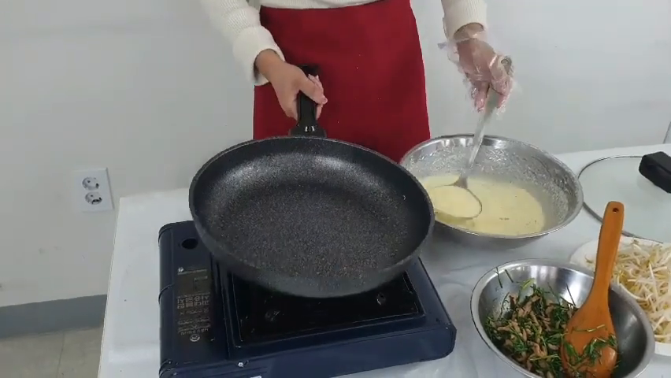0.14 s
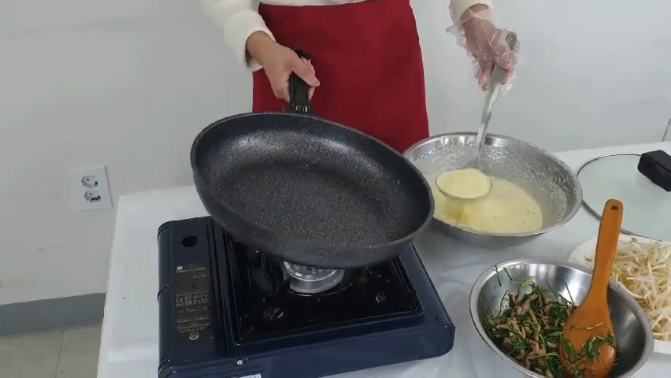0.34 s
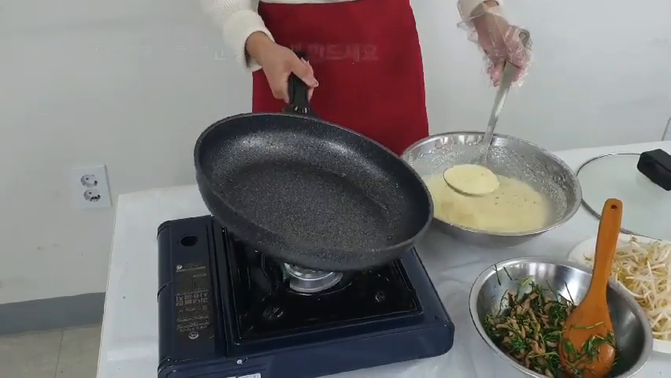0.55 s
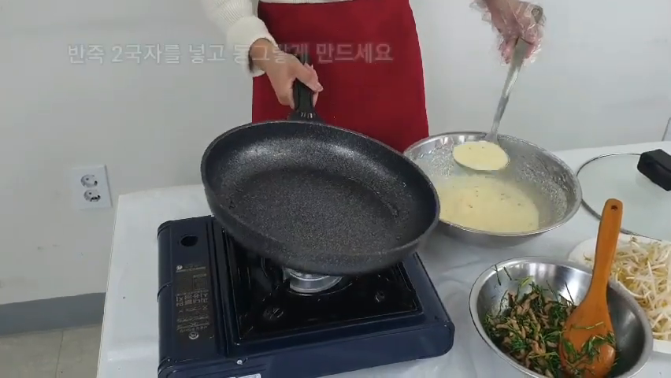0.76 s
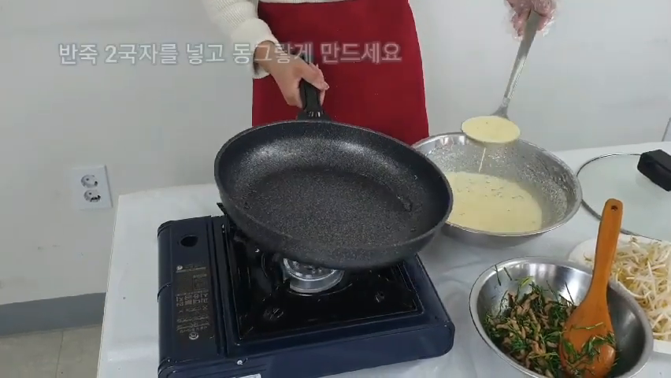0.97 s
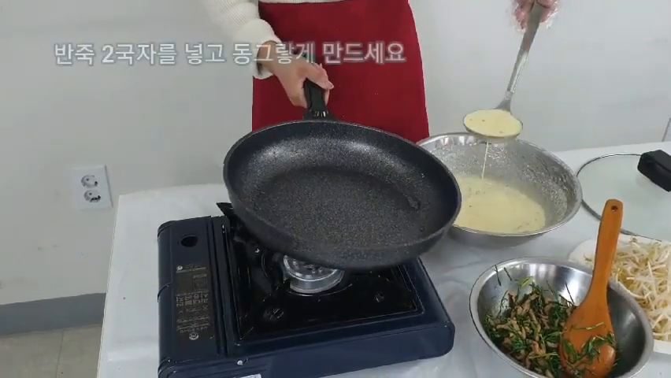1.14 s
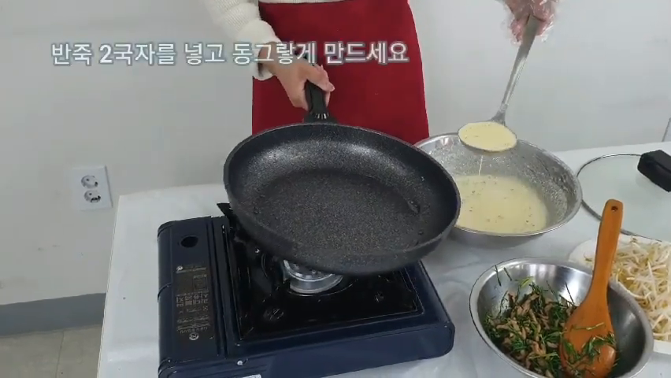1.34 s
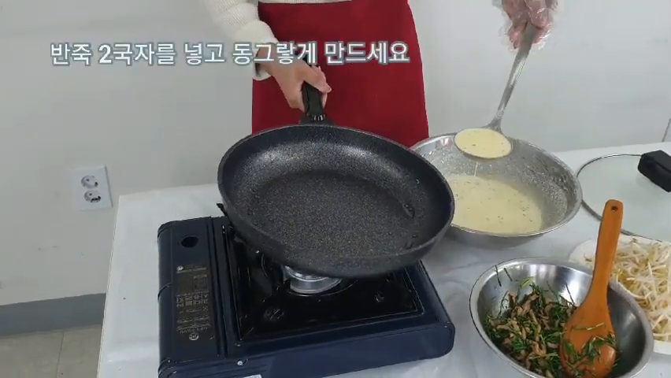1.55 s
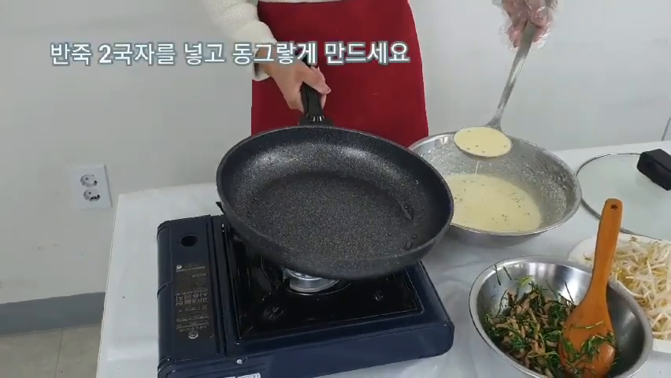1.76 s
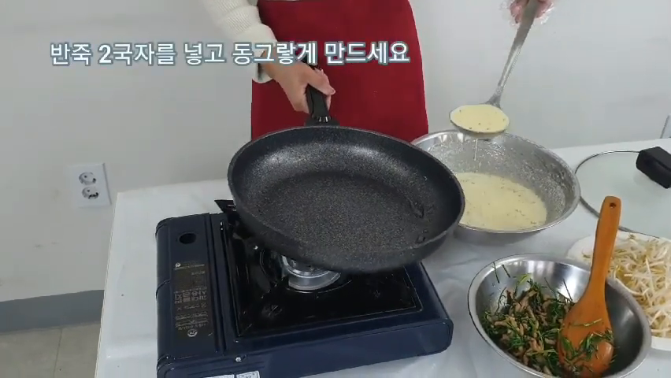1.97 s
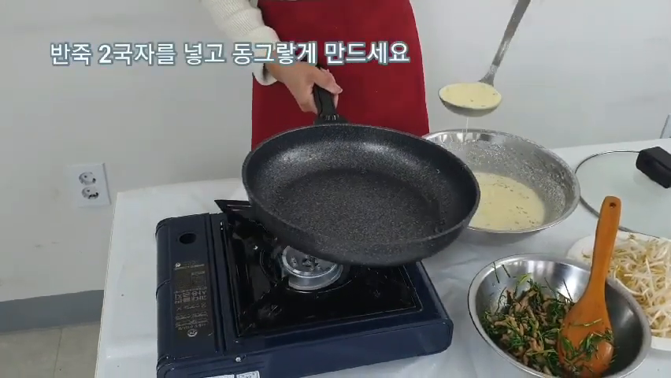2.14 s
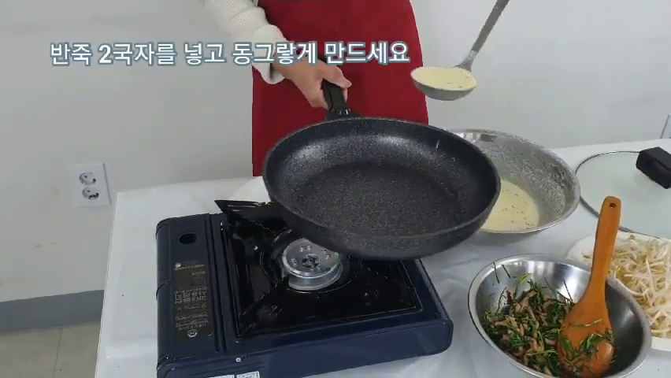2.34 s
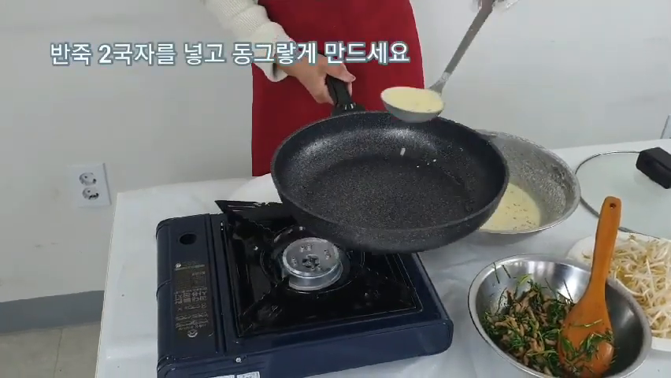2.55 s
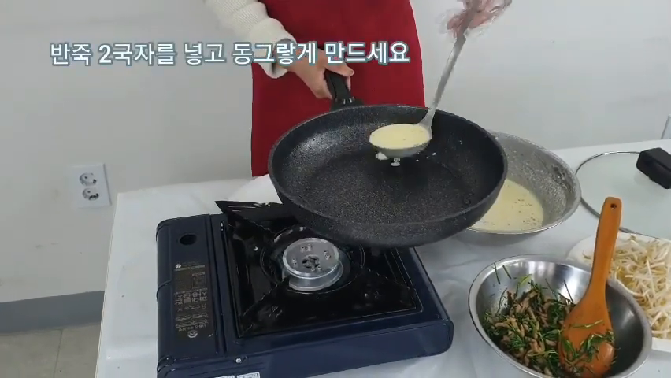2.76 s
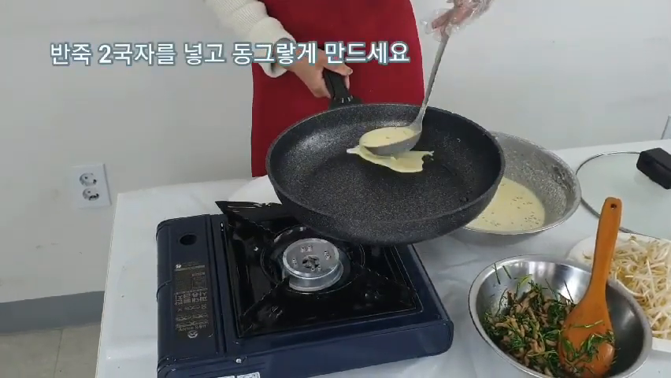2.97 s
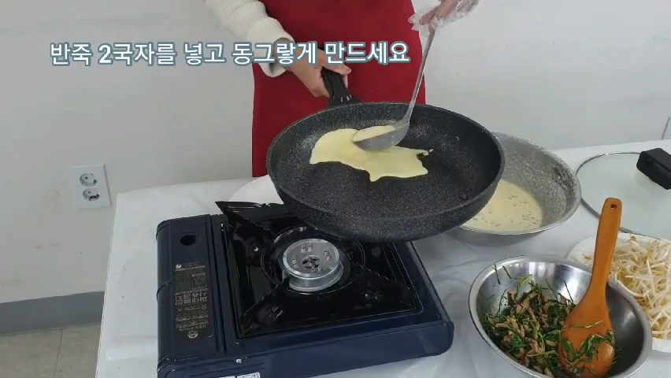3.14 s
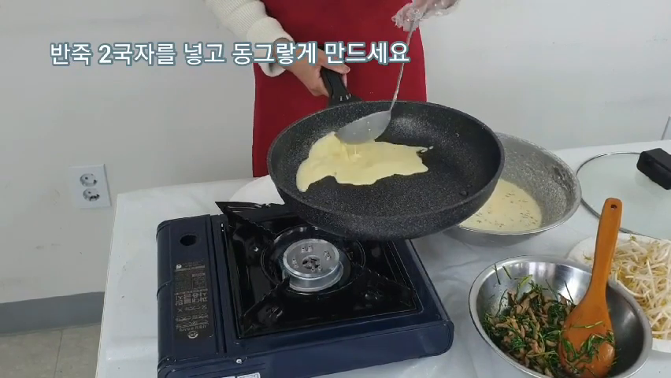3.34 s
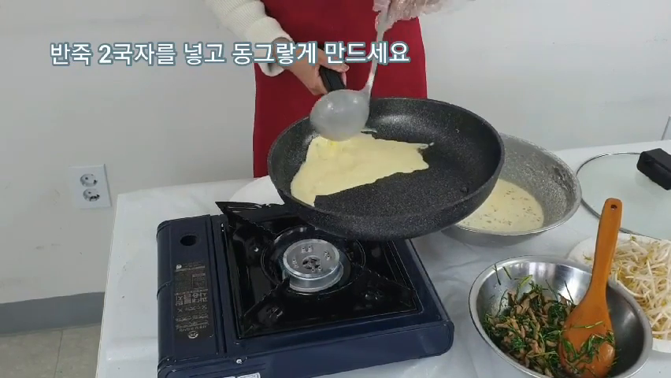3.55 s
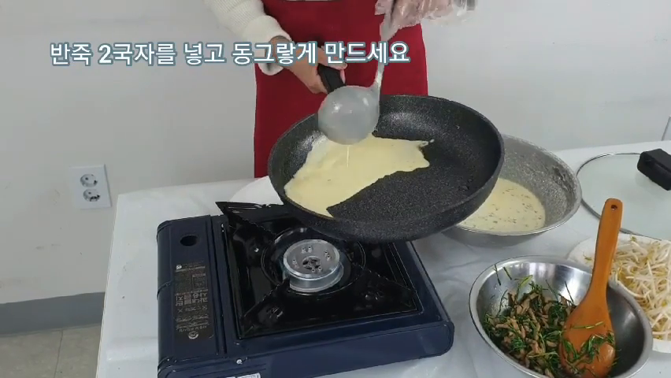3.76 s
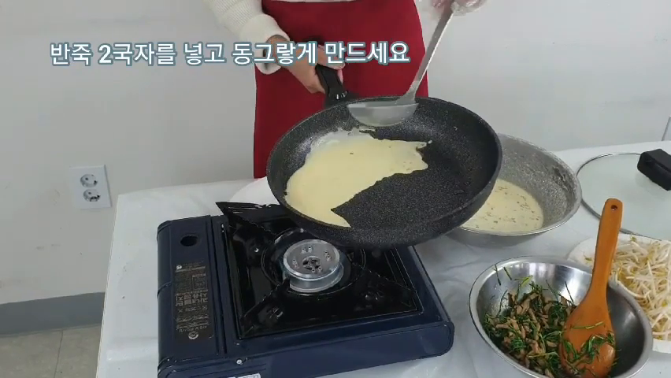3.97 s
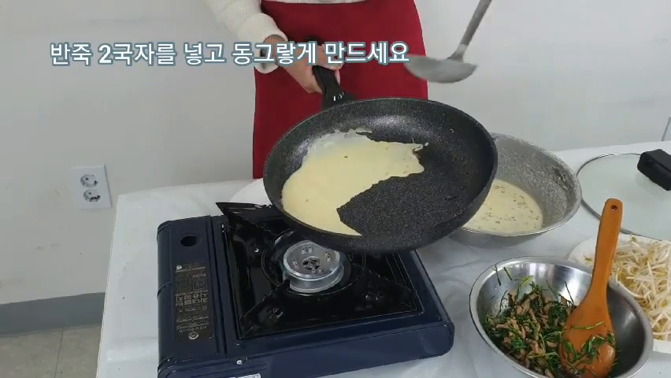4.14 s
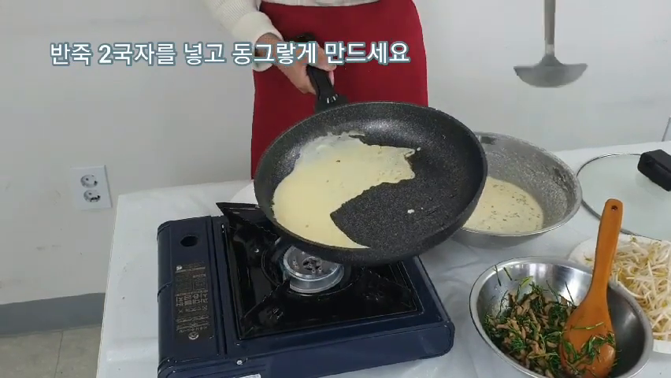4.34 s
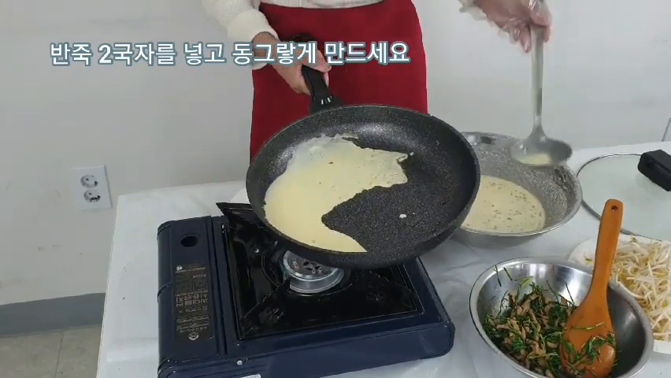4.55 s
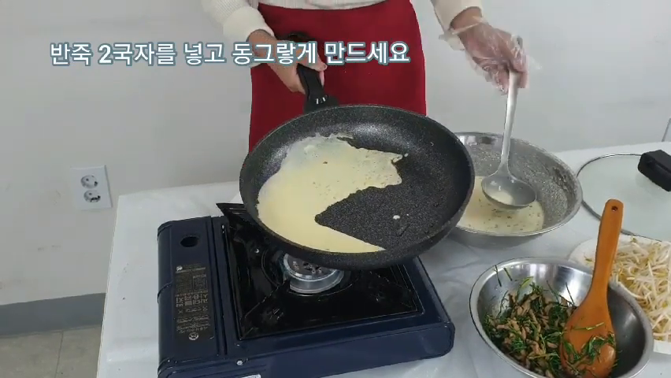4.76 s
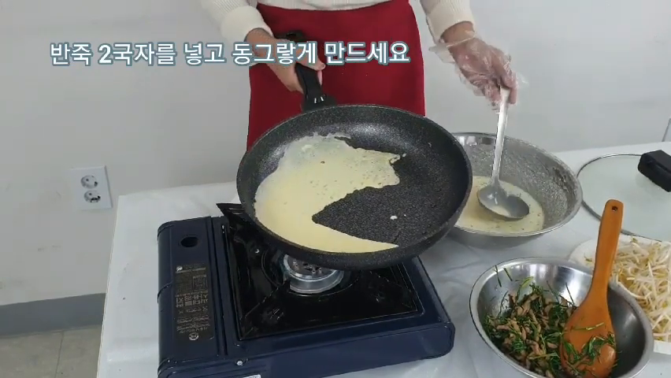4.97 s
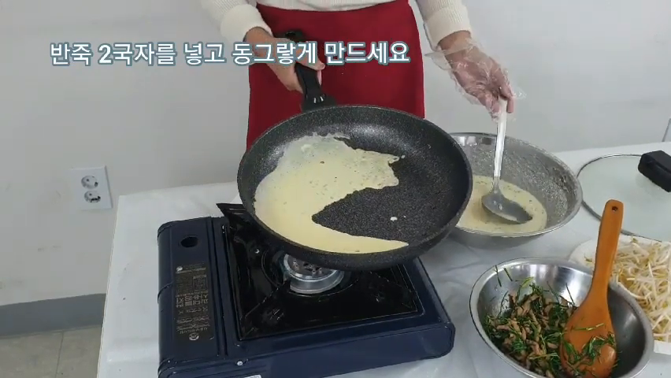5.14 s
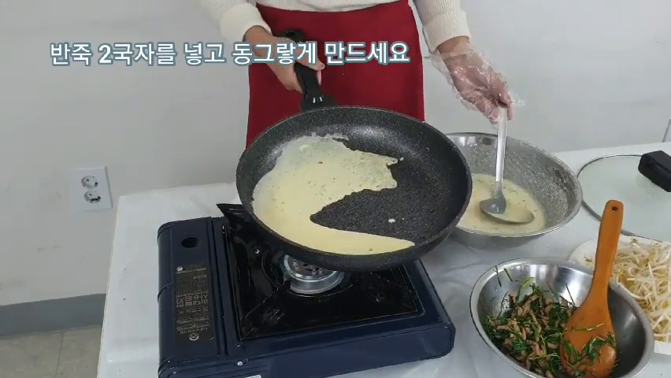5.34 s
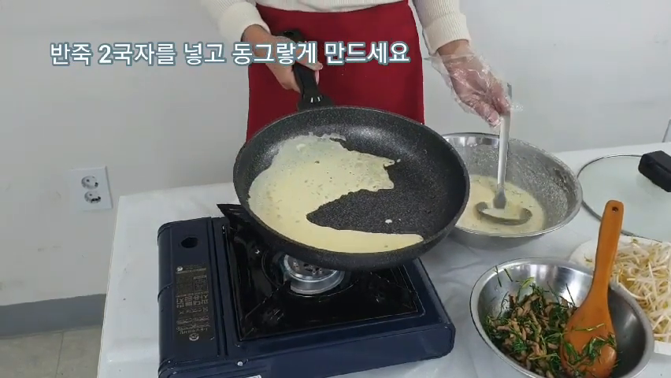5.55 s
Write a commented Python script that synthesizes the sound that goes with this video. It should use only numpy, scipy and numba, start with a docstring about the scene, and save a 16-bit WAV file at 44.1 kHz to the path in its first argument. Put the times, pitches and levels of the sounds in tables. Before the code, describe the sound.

A low motor hum fills a hard-walled kitchen. A frying pan knocks lightly on a burner, then a sleeve and plastic glove rustle while a ladle clinks and scrapes in a steel bowl. The pan gives a soft, low thump. About halfway through, batter meets hot oil and erupts into a spitting, bubbling sizzle that carries on. At the end the ladle knocks dully in the bowl. A stereo microphone faces the stove.

```python
"""A hard-walled kitchen, a stereo microphone pair facing the stove, a motor humming throughout.
The pan knocks on the burner; sleeve and plastic glove rustle as the ladle clinks and scrapes in the bowl.
The pan grazes the burner and jolts in the hand. From 2.4 s drips of batter hiss in the hot oil; at 2.8 s
the pour erupts in spits and bursting steam bubbles, which grow larger and calmer as the batter spreads.
At the end the ladle goes back into the mixing bowl and knocks against it."""
import sys
import numpy as np
from scipy import signal
from scipy.fft import rfft, irfft, next_fast_len
from scipy.io import wavfile
from scipy.ndimage import map_coordinates
from numba import njit

SR = 44100
rng = np.random.default_rng(int(sys.argv[2]) if len(sys.argv) > 2 else 0)


def transcribe(u):
    """Save the signal u as a 16-bit wav file named by the first command-line argument.

    u: samples, shape (n,) or (channels, n), limited to [-1, 1]; the rate is SR.
    q: integer samples, one column per channel.
    """
    v = np.clip(np.atleast_2d(u).T, -1, 1)
    q = np.round(v * 32767).astype(np.int16)
    wavfile.write(sys.argv[1], SR, q)


N = 246903
T = np.arange(N) / SR

# motor harmonics: (multiple, relative level [dB], phase shift either way at the microphones [rad])
HUM_HARMONICS = [(1, 0.5, 0.16), (2, 3.0, .02)]
# the hum swells and sags: (time [s], change [dB], half length [s])
HUM_DRIFTS = [(0.843, -6, 0.05), (2.113, 6, 0.049), (2.33, -7, 0.035), (2.785, -2, .08),
              (3.032, 6.5, 0.078), (3.478, 3.2, 0.21), (4.11, 2.5, 0.13), (4.753, -3, 0.085)]
# room tone: (frequency [Hz], relative level [dB])
AIR_SPECTRUM = [(20, 1.5), (35, -4.5), (55, 3), (90, 1), (170, -1), (260, -4.5), (450, -9.5), (800, -16.5),
                (1600, -23.5), (3200, -32.5), (7000, -35.5), (15500, -36.5)]
# stereo width of the room: (frequency [Hz], side minus mid [dB])
ROOM_WIDTH = [(30, -5.5), (110, -15), (200, -14), (380, -9), (700, -1), (1300, 0.5), (15000, -4)]

# arm strokes: (time [s], relative rub level [dB], relative crinkle level [dB], rise [s], fade [dB/s])
ARM_STROKES = [(-.02, -56.5, -64, 0.018, 44), (.53, -59, -62, 0.011, 43), (.86, -64, -71, 0.041, 12),
               (1.064, -52.5, -59, 0.005, 23), (1.145, -52.5, -76, .012, 70), (1.228, -46, -50, 0.0054, 44),
               (1.343, -46.5, -52.5, 0.0058, 83), (1.425, -50, -60, .008, 98.5),
               (1.555, -49, -51, 0.037, 50), (1.652, -51, -57, 0.013, 80), (1.745, -51.5, -57.5, 0.015, 80),
               (1.805, -53.5, -62, 0.01, 100), (2.05, -68, -71, .015, 100)]
# sleeve cloth and glove plastic: (frequency [Hz], relative level [dB])
RUB_SPECTRUM = [(400, 3), (750, 0.5), (1300, -1.5), (1700, 2.5), (2400, -1.5), (3200, -6.5), (4500, -14),
                (8000, -42)]
CRINKLE_SPECTRUM = [(2000, -12), (3500, -5.5), (4800, -2.5), (8000, -3.5), (11000, -8), (15500, -6.5)]
# the glove snaps as it creases: (time [s], relative level [dB])
GLOVE_SNAPS = [(1.0657, -36.5), (1.1724, -49), (1.2303, -37), (1.2767, -39), (1.357, -37), (1.4294, -35),
               (1.455, -43), (1.598, -43), (1.659, -35), (1.675, -37), (1.819, -43)]
# thick batter sloshes: (time [s], level [dB], centre [Hz])
BATTER_SLOSHES = [(-.015, -46.5, 278), (-.01, -53.5, 690), (3.77, -44, 260), (3.86, -45, 210),
                  (5.25, -43, 430), (5.37, -44, 215), (5.425, -44, 204), (5.559, -35, 580),
                  (5.56, -37, 215)]
# light clinks of the ladle: (time [s], level [dB], pitch [Hz])
LADLE_CLINKS = [(.055, -51.5, 1480), (1.066, -51, 3560), (1.127, -54, 3400), (1.167, -54, 2950)]
# ladle on the steel bowl: (time [s], level [dB], pitch [Hz], width [Hz], rise [s], fade [dB/s])
LADLE_SCRAPES = [(.322, -58, 3000, 400, .01, 102), (.395, -68, 3240, 400, .03, 80),
                 (.53, -57, 1920, 650, 0.032, 85), (1.165, -61, 2850, 600, .012, 60),
                 (1.345, -51.5, 2200, 1100, 0.014, 90), (1.535, -48, 2220, 910, 0.055, 47),
                 (1.75, -52.5, 2300, 1000, 0.018, 90), (5.552, -39, 6500, 6000, 0.026, 150)]

# the pan knocks on the burner: (time [s], level [dB])
BURNER_KNOCKS = [(0.001, -40)]
# the burner's casing: (frequency [Hz], relative level [dB], t60 [s])
BURNER_MODES = [(191, -3, 0.19), (253, 0, .3), (370, -5.5, 0.27), (587, -11.5, .1)]
# the pan grazes the burner: (time [s], level [dB], relative overtone level [dB], rise [s], fade [dB/s])
PAN_GRAZES = [(1.205, -49.5, -21, 0.04, 40), (1.338, -39.5, -5, 0.014, 137),
              (1.435, -46.5, -20, 0.018, 190)]
# the lifted pan jolts and settles: (time [s], level [dB])
PAN_JOLTS = [(2.087, -28), (2.175, -37.5)]
# the low ring of a jolt: (frequency [Hz], relative level [dB], t60 [s])
PAN_LOW_MODES = [(77.6, 1, 0.31), (111.6, -8.5, 0.43), (174.3, -13, 0.58)]

# drips and tongues of batter reach fresh oil: (time [s], relative level [dB], rise [s], fade [dB/s])
BATTER_SPLASHES = [(2.39, -63, 0.049, 15), (2.478, -53.5, 0.038, -2), (2.627, -40.5, 0.052, 61),
                   (2.836, -39.5, 0.0087, 32), (2.9, -45, 0.023, 90), (3.26, -36.5, 0.028, 64),
                   (3.42, -43, 0.022, 70), (4.195, -43, .015, 120), (4.83, -43.5, .025, 92),
                   (5.228, -56, 0.0089, 160), (5.418, -43, 0.011, 170)]
# the spray ebbs between flare-ups: (time [s], change [dB], half length [s])
SPRAY_LULLS = [(3.208, -1, 0.036), (4.31, -1, 0.018), (4.796, -4, 0.029), (4.95, -2.5, .035),
               (5.382, -5, .025), (5.505, -7, 0.044)]
# small, middling and large bubbles: (frequency [Hz], relative level [dB])
SPRAY_SPECTRUM = [(1500, -10), (2500, -7.5), (4200, -2.5), (7000, -1.5), (10000, -3), (13000, -1.5),
                  (15500, -2.5)]
BUBBLE_SPECTRUM = [(750, -17), (1100, -5), (1450, -3.5), (2300, 1), (3500, -2), (5500, -6.5), (8000, -6.5)]
BURBLE_SPECTRUM = [(150, 4), (250, 1.5), (330, -10.5), (420, -0.5), (540, -2.5), (700, -0.5), (880, 2),
                   (1300, -5.5), (2000, -1)]
# bubbles grow as the batter pools, so their lowest pitch sinks: (time [s], pitch [Hz])
LOWEST_BUBBLE_PITCH = [(2.84, 3070), (2.89, 2050), (2.93, 1447), (3.05, 1260), (3.15, 1070), (3.45, 774.5)]
# the pan rings under the bursts: (frequency [Hz], width [Hz], level relative to the direct sound [dB])
PAN_RESONANCES = [(432, 22, -0.5), (1460, 250, -5.5), (2010, 160, -10), (2550, 130, -12), (3570, 130, -7.5),
                  (4700, 40, -17), (6300, 160, -10), (7550, 130, -4)]
# jets of steam, and at 2.985 s a brief band of young bubbles at their deepest pitch near 2.3 kHz: (time [s],
# level [dB], pitch [Hz], width [Hz], rise [s], t60 [s])
STEAM_SQUEALS = [(2.70, -50, 1640, 300, 0.035, .45), (2.73, -49, 2440, 70, 0.034, 0.83),
                 (2.985, -34, 2320, 550, 0.066, 0.19), (2.985, -34, 4580, 220, 0.017, .12)]
# loud spits of oil: (time [s], relative level [dB])
OIL_SPITS = [(2.8393, -28), (2.9417, -16), (3.0295, -21), (3.0524, -20), (3.2894, -17), (3.437, -18),
             (3.4608, -13), (3.8305, -23), (4.1715, -22), (4.5706, -16.5), (4.7058, -20), (4.8585, -23),
             (5.161, -22), (5.241, -23.5), (5.429, -24)]

# the ladle chatters on the bowl: (time [s], level [dB])
BOWL_KNOCKS = [(5.561, -32), (5.568, -29), (5.574, -27.5), (5.582, -31.5)]
# the bowl, damped by batter: (frequency [Hz], relative level [dB], t60 [s])
BOWL_MODES = [(203, -4, 0.29), (310, -12, 0.084), (426, -5, 0.14), (560, 2.5, 0.14), (640, -1, 0.038),
              (748, 0, 0.043), (850, -14, 0.056), (1060, -9, 0.083), (1280, -9, 0.049), (1555, -3, 0.061),
              (2230, -10, 0.049)]


def undb(db):
    """Decibels to gain."""
    return 10 ** (np.asarray(db) / 20)


def unit(x):
    """Scale to rms 1."""
    return x / np.sqrt(np.mean(x ** 2) + 1e-20)


def colour(x, spectrum):
    """Filter by a spectrum of (frequency [Hz], level [dB]) points, rolling off past its ends; rms 1."""
    hz, db = np.transpose(spectrum)
    size = next_fast_len(N + 4096)
    f = np.maximum(np.fft.rfftfreq(size, 1 / SR), 1)
    shape = undb(np.interp(np.log(f), np.log(hz), db))
    roll_off = np.minimum(f / hz[0], 1) ** 2 * np.minimum(hz[-1] / f, 1) ** 2
    return unit(irfft(rfft(x, size) * shape * roll_off, size)[..., :N])


def wander(per_s):
    """Smooth random wander with a spread near 1."""
    return map_coordinates(rng.standard_normal(1024), [T * per_s], order=2, mode="wrap")


def swell(start, db, rise_s, fade_db_per_s):
    """Gain of one gesture: a straight rise, then a steady fade."""
    fade_db = fade_db_per_s * np.maximum(T - start - rise_s, 0)
    return np.clip((T - start) / rise_s, 0, 1) * undb(db - fade_db)


def drift_db(table):
    """Bell-shaped rises and dips in level."""
    return sum(db * np.exp(-((T - s) / half_length) ** 2) for s, db, half_length in table)


def together(gains):
    """Gains of unrelated sounds add in power."""
    return np.sqrt(sum(g ** 2 for g in gains))


def diffuse_noise():
    """Room-filling noise: the bass is alike at both microphones, the treble largely unrelated."""
    mid, side = rng.standard_normal((2, N))
    side_db = np.interp(np.fft.rfftfreq(N, 1 / SR), *np.transpose(ROOM_WIDTH))
    side = irfft(rfft(side) * undb(side_db), N)
    return unit(np.array([mid + side, mid - side]))


def kitchen(x, wet_db, t60=0.15):
    """Direct sound plus the hard walls' tail at each microphone; wetter sounds farther off."""
    age = np.arange(SR // 2) / SR
    tail = rng.standard_normal((2, len(age))) * undb(-60 * age / t60) * (age > .003)
    tail /= np.sqrt(np.sum(tail ** 2, axis=1, keepdims=True))
    direct = x * np.ones((2, 1))
    reflected = signal.fftconvolve(direct, tail, axes=1)[:, :N]
    return (direct + undb(wet_db) * reflected) / np.sqrt(1 + undb(wet_db) ** 2)


def resonance(x, hz, width_hz):
    """One steep resonance; rms 1."""
    band = signal.iirpeak(hz, hz / min(1.27 * width_hz, SR / 3), fs=SR)
    return unit(signal.lfilter(*band, signal.lfilter(*band, x)))


@njit
def grains(start, hz, life, size, lag):
    """Damped rings that reach the two microphones a lag apart; start, life and lag are in samples."""
    out = np.zeros((2, N))
    for k in range(len(start)):
        pole = np.exp(2j * np.pi * hz[k] / SR - 1 / life[k])
        for mic in range(2):
            phasor = size[k] / np.sqrt(life[k]) + 0j
            first = max(int(start[k] + (mic - .5) * lag[k]), 0)
            for i in range(first, min(first + int(6 * life[k]) + 2, N)):
                phasor *= pole
                out[mic, i] += phasor.imag
    return out


def crackle(count, low_hz, high_hz, cycles, scatter_db):
    """A swarm of tiny ringing bursts, most faint and a few loud; the pitch limits may be curves."""
    when, pitch, length, size, place = rng.random((count, 5)).T
    onset = (when * N).astype(int)
    low = np.broadcast_to(low_hz, N)[onset]
    high = np.broadcast_to(high_hz, N)[onset]
    hz = low + (high - low) * pitch
    life = cycles * 4 ** (length - .5) * SR / hz
    loudness = undb(-scatter_db * np.log(size + 0.0049))
    return grains(when * N, hz, life, loudness, lag=5 * (2 * place - 1))


def cracks(table, low_hz, fade_s):
    """Bright cracks that start at once and die within milliseconds."""
    gain = sum(undb(db) * np.exp(-np.maximum(T - s, 0) / fade_s) * (T >= s) for s, db in table)
    return gain * signal.lfilter(*signal.butter(2, low_hz, "high", fs=SR), rng.standard_normal((2, N)))


def strike(blows, modes):
    """Each blow sets a body's damped modes ringing."""
    ring = sum(undb(db - 60 * T / t60) * np.sin(2 * np.pi * hz * T) for hz, db, t60 in modes)
    return sum(undb(db) * np.interp(T - s, T, ring, left=0) for s, db in blows)


def motor_hum(motor_hz=59.2, level_db=-45):
    """A motor drones on two wavering harmonics; standing waves shift phase and level at each microphone."""
    gain = undb(level_db + drift_db(HUM_DRIFTS) + 0.6 * wander(per_s=7))
    phase = 2 * np.pi * motor_hz * T + 0.047 * wander(per_s=2.54)
    sides = np.array([[-1], [1]])
    drone = sum(undb(db + 1.5 * wander(per_s=11)) * np.sin(multiple * phase + shift * sides)
                for multiple, db, shift in HUM_HARMONICS)
    return undb(0.29 * sides) * gain * drone


def room_tone(level_db=-49):
    """The kitchen air rushes low all around, a little louder on the right."""
    air = colour(diffuse_noise(), AIR_SPECTRUM)
    return undb(level_db + 0.45 * wander(per_s=4.46)) * undb([[-.5], [.5]]) * air


def sleeve_and_glove():
    """Cloth rubs and thin plastic crinkles and snaps as the arm lifts the ladle."""
    rub_gain = together(swell(s, db, rise, fade) for s, db, _, rise, fade in ARM_STROKES)
    crinkle_gain = together(swell(s, db, rise, fade) for s, _, db, rise, fade in ARM_STROKES)
    rub = crackle(count=16000, low_hz=363, high_hz=8150, cycles=5.5, scatter_db=2.0)
    crinkle = crackle(count=14000, low_hz=2000, high_hz=16000, cycles=0.74, scatter_db=2.4)
    snaps = cracks(GLOVE_SNAPS, low_hz=4500, fade_s=0.0021)
    return (kitchen(rub_gain * colour(rub, RUB_SPECTRUM), wet_db=3.5)
            + kitchen(undb(3) * crinkle_gain * colour(crinkle, CRINKLE_SPECTRUM), wet_db=5.5)
            + kitchen(undb(0.5) * snaps, wet_db=2))


def ladle():
    """The ladle moves the thick batter, clinks lightly and drags unevenly over the steel bowl."""
    contact = diffuse_noise()
    sloshes = sum(swell(s, db, rise_s=0.014, fade_db_per_s=102) * resonance(contact, hz, 0.78 * hz)
                  for s, db, hz in BATTER_SLOSHES)
    clinks = sum(swell(s, db, rise_s=0.004, fade_db_per_s=300) * resonance(contact, hz, 0.09 * hz)
                 for s, db, hz in LADLE_CLINKS)
    scrapes = sum(swell(s, db, rise, fade) * resonance(contact, hz, width)
                  for s, db, hz, width, rise, fade in LADLE_SCRAPES)
    drag = undb(1.3 * wander(per_s=60))
    return sloshes + clinks + drag * scrapes


def burner_knock():
    """The pan knocks the burner's casing as it is lifted."""
    return kitchen(strike(BURNER_KNOCKS, BURNER_MODES), wet_db=-8)


def pan_grazes():
    """The pan slides on the burner and rings roughly; hard contact wakes an overtone."""
    friction = diffuse_noise()
    main_gain = together(swell(s, db, rise, fade) for s, db, _, rise, fade in PAN_GRAZES)
    overtone_gain = together(swell(s, db + over, rise, fade) for s, db, over, rise, fade in PAN_GRAZES)
    return (main_gain * resonance(friction, hz=1036, width_hz=86)
            + overtone_gain * resonance(friction, hz=1700, width_hz=170))


def pan_jolts(cushion_hz=220):
    """The lifted pan thumps, close and dry, cushioned by the hand."""
    return signal.lfilter(*signal.butter(2, cushion_hz, fs=SR), strike(PAN_JOLTS, PAN_LOW_MODES))


def boiling_gains(pour_s=2.835):
    """Gains of spray, bubbles and burble: splashes and the pour flare up, then calm as the pan cools."""
    splashes = together(swell(*row) for row in BATTER_SPLASHES)
    spray = swell(pour_s, db=-36, rise_s=0.082, fade_db_per_s=3.5) * undb(drift_db(SPRAY_LULLS))
    bubbles = swell(pour_s, db=-38, rise_s=0.082, fade_db_per_s=3)
    # bare hot metal boils the first batter harder; large bubbles build up as it pools
    flash = swell(pour_s, db=-37, rise_s=0.2, fade_db_per_s=46)
    burble = swell(pour_s, db=-47.5, rise_s=0.31, fade_db_per_s=0.03)
    return (together([splashes, spray]),
            together([undb(-19) * splashes, bubbles, flash]),
            together([undb(-15.5) * splashes, burble]))


def pan_ring(x):
    """The metal adds its own faint ring to whatever bursts on it."""
    return x + sum(undb(db) * signal.lfilter(*signal.iirpeak(hz, hz / width, fs=SR), x)
                   for hz, width, db in PAN_RESONANCES)


def frying():
    """Water flashes to steam in the oil: spray snaps, bubbles ring, large ones burble under the batter."""
    spray = crackle(count=40000, low_hz=1400, high_hz=15800, cycles=0.6, scatter_db=3.0)
    ticks = crackle(count=1500, low_hz=8700, high_hz=16000, cycles=2.0, scatter_db=3.5)
    pings = crackle(count=4500, low_hz=2491, high_hz=15930, cycles=23, scatter_db=0.97)
    lowest_hz = np.interp(T, *np.transpose(LOWEST_BUBBLE_PITCH))
    bubbles = crackle(count=15000, low_hz=lowest_hz, high_hz=6955, cycles=8.7, scatter_db=0.4)
    burble = crackle(count=14000, low_hz=147.5, high_hz=1983, cycles=2.06, scatter_db=1.0)
    pops = crackle(count=700, low_hz=10000, high_hz=15500, cycles=1.2, scatter_db=3.8)
    spray_gain, bubble_gain, burble_gain = boiling_gains()
    puffs = undb(0.55 * wander(per_s=24))  # steam escapes unevenly
    spray = undb(2) * puffs * spray_gain * colour(spray, SPRAY_SPECTRUM)
    ticks = undb(-4) * puffs * spray_gain * colour(ticks, SPRAY_SPECTRUM)
    pings = undb(0.5) * puffs * spray_gain * colour(pings, SPRAY_SPECTRUM)
    bubbles = undb(0.14) * puffs * bubble_gain * colour(bubbles, BUBBLE_SPECTRUM)
    burble = undb(1.5) * puffs * burble_gain * colour(burble, BURBLE_SPECTRUM)
    pops = undb(-7.5) * spray_gain * colour(pops, SPRAY_SPECTRUM)
    # each kind of burst reaches the walls from its own part of the pan
    return (kitchen(pan_ring(spray), wet_db=2.5, t60=0.29)
            + kitchen(ticks, wet_db=23, t60=0.53)
            + kitchen(pan_ring(pings), wet_db=2.5, t60=0.075)
            + kitchen(pan_ring(bubbles), wet_db=-5)
            + kitchen(pan_ring(burble), wet_db=-3.5)
            + kitchen(pops, wet_db=3))


def steam_squeals():
    """Short jets of steam whistle out from under the batter; with the last, young bubbles ring briefly in a
    band near 2.3 kHz."""
    steam = diffuse_noise()
    return sum(swell(s, db, rise, 60 / t60) * resonance(steam, hz, width)
               for s, db, hz, width, rise, t60 in STEAM_SQUEALS)


def oil_spits():
    """Droplets of water burst in the oil, sharp and close."""
    return kitchen(cracks(OIL_SPITS, low_hz=9500, fade_s=0.0005), wet_db=-14)


def blisters(start=2.9, sink_octaves_per_s=0.75):
    """Large bubbles at the edge of the running batter ring in a band that sinks as they grow."""
    low_hz = 1450 * 2 ** (-sink_octaves_per_s * np.maximum(T - start, 0))
    swarm = unit(crackle(count=2000, low_hz=low_hz, high_hz=1.55 * low_hz, cycles=15, scatter_db=1.5))
    return kitchen(swell(start, db=-43.5, rise_s=0.38, fade_db_per_s=12.5) * swarm, wet_db=-4)


def bowl_knocks():
    """The ladle knocks dully in the batter-filled bowl, more room than direct sound."""
    return kitchen(strike(BOWL_KNOCKS, BOWL_MODES), wet_db=6, t60=0.32)


def scene(right_db=0.6):
    """Everything stands a little to the right of the microphone pair."""
    room = motor_hum() + room_tone()
    handling = sleeve_and_glove() + ladle() + burner_knock() + pan_grazes() + pan_jolts()
    cooking = frying() + steam_squeals() + oil_spits() + blisters()
    return (room + handling + cooking + bowl_knocks()) * undb([[-right_db / 2], [right_db / 2]])


def record(dry):
    """The recorder cuts the top steeply."""
    top_hz = 15700
    return signal.sosfilt(signal.ellip(10, .2, 70, top_hz, fs=SR, output="sos"), dry)


dry = scene()
out = record(dry)
transcribe(out)
```